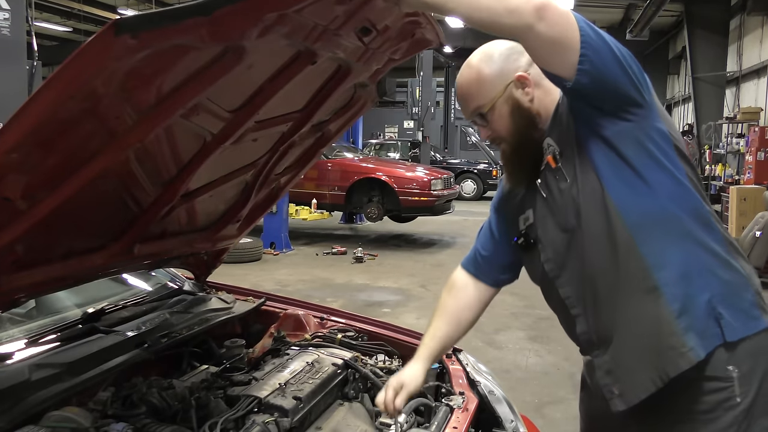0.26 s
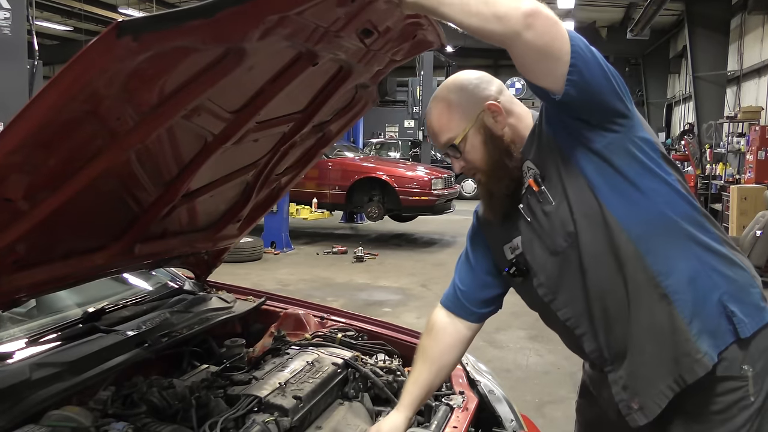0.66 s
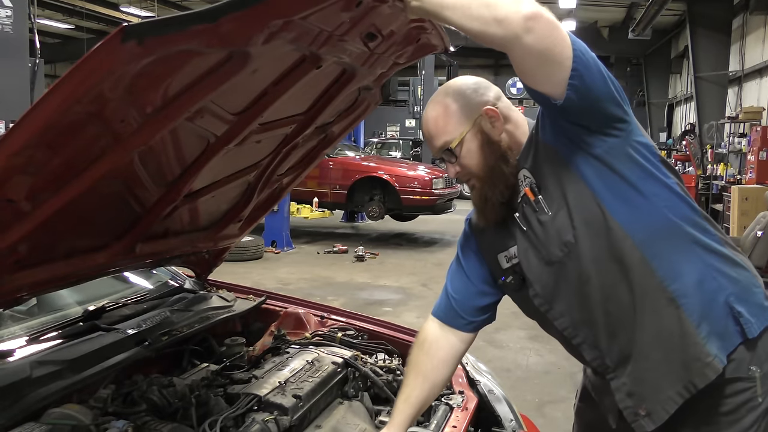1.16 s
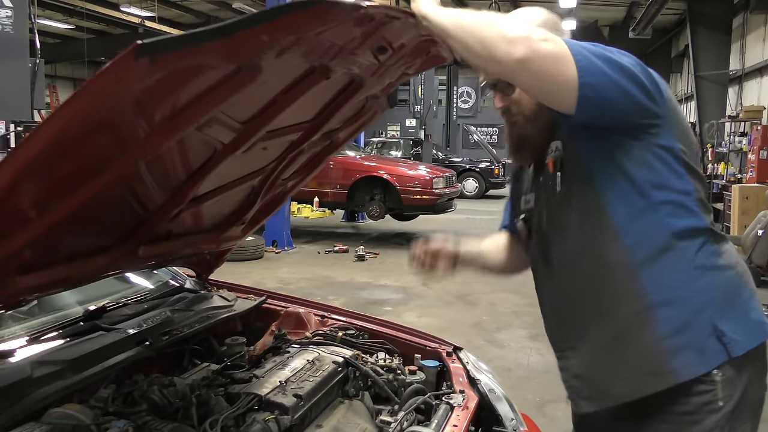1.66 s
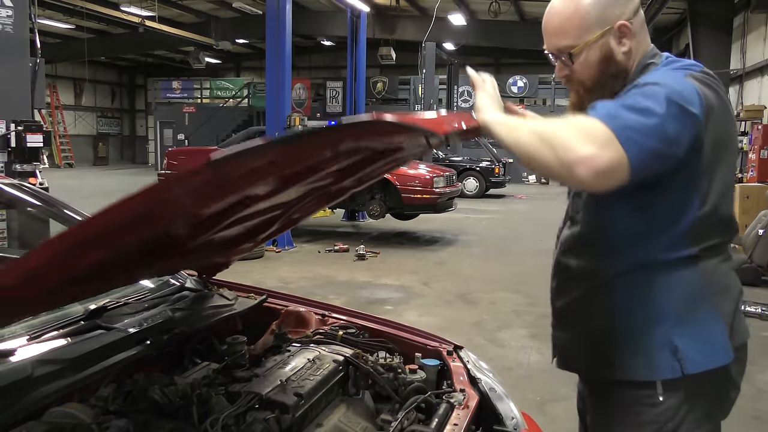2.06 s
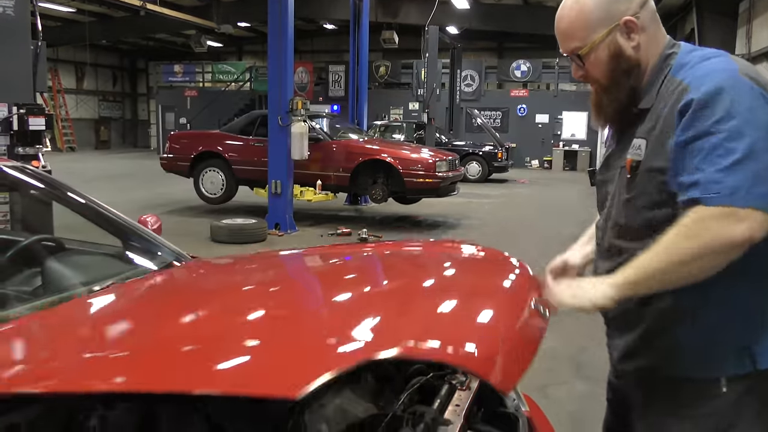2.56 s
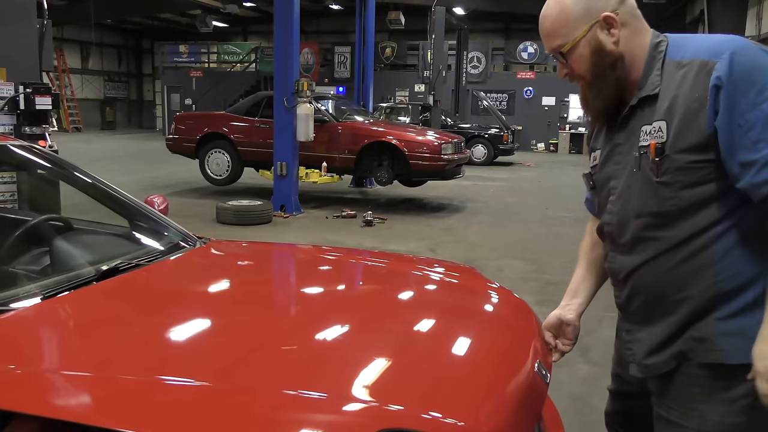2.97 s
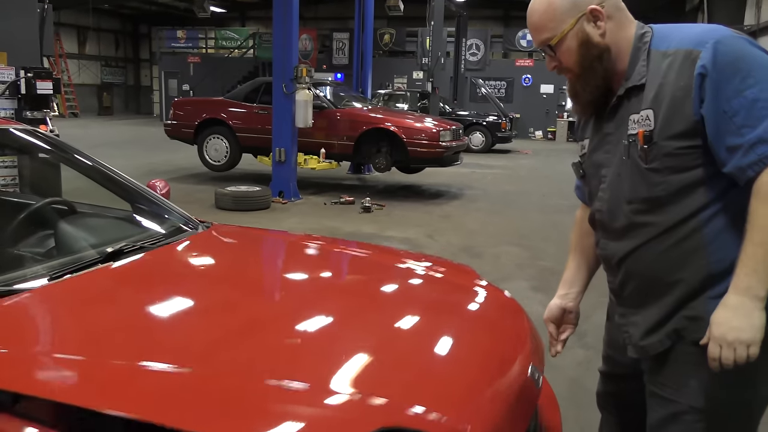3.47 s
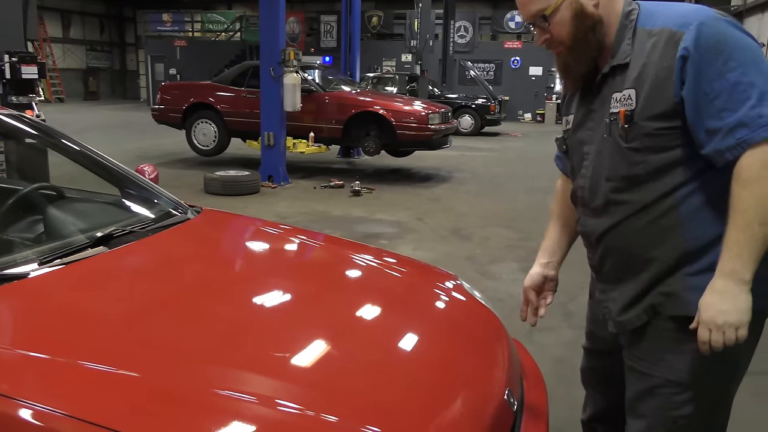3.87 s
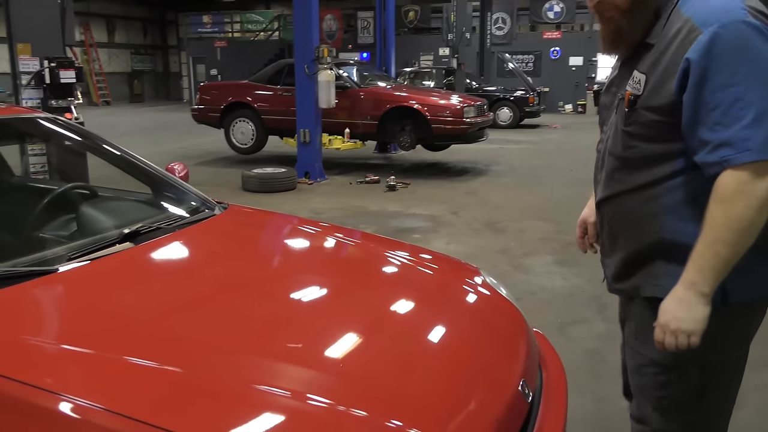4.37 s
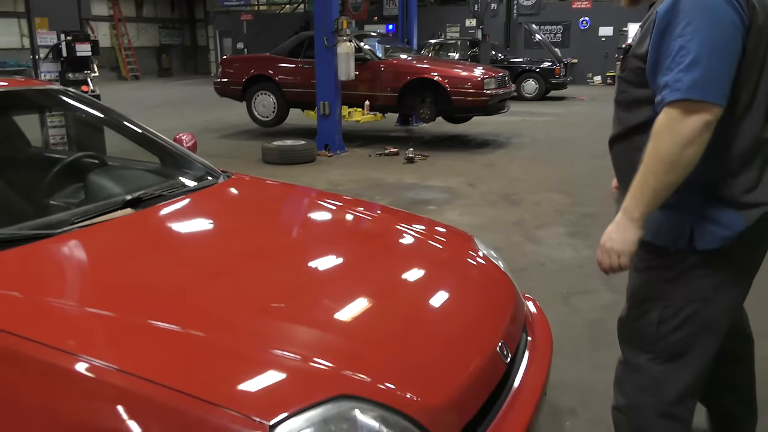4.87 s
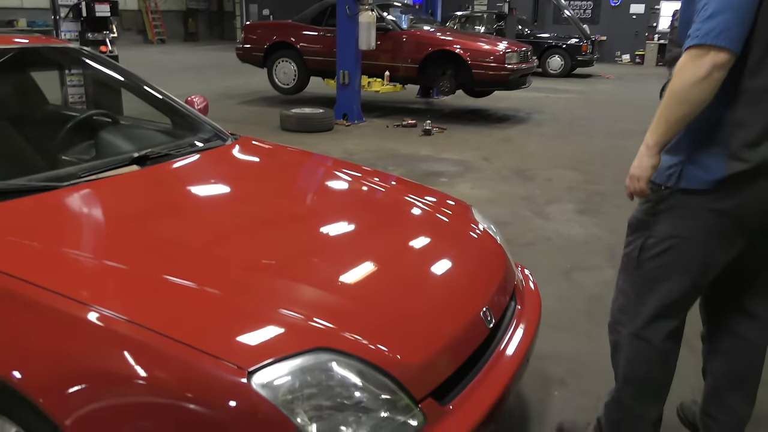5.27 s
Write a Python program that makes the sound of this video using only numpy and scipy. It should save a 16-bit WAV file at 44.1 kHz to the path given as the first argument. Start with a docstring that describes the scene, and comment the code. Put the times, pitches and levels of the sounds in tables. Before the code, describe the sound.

A low hum and steady hall noise fill a large workshop, with the action close to the microphone and clothes rustling faintly now and then. From about 0.3 seconds a steel prop rod scrapes and rattles lightly, then snaps into its clip at 1.2 seconds with a loud, ringing click. At 2 seconds the car hood gives a soft, hollow bonk under a hand, and its hinges creak and tick quietly from 2.4 to 2.8 seconds. The hood knocks sharply on its catch at 3.1 seconds. At 3.6 seconds it slams shut with a heavy metal boom, a latch clack and a brief shudder, echoing off the far walls. A very faint, thin, high squeal wanders from 4 to 5 seconds. Around 5 seconds boots thud softly on concrete with two tiny squeaks, and the hum carries on until the end at about 5.5 seconds.

```python
"""A workshop hall, close to a mechanic, over a low hum, hall noise and rustling clothes. A steel prop rod
scrapes, rattles and snaps into its clip (1.2 s). The hood bonks under a hand (2 s), creaks down on its
hinges, knocks on its catch (3.1 s) and slams shut (3.6 s), with the level pulled down around the slam.
The blows ring the metal and the far walls answer late. A thin squeal wanders through the tail, and
boots thud and squeak on the concrete (5 s)."""
import sys
import numpy as np
from scipy import signal
from scipy.fft import rfft, irfft
from scipy.io import wavfile
from scipy.ndimage import uniform_filter1d

SR = 44100
rng = np.random.default_rng(int(sys.argv[2]) if len(sys.argv) > 2 else 0)


def store_wav(level_fs):
    """Save 16-bit WAV to argv[1]."""
    pcm = np.round(np.clip(np.atleast_2d(level_fs), -1, 1) * 32767)
    wavfile.write(sys.argv[1], SR, pcm.T.astype(np.int16))


N = 243591

# hood on hinges, hands and rubber stops (time [s], level [dB], hardness [dB], chatter [ms])
HOOD_HITS = [(2.0055, -26, -4, 4.7), (2.027, -25, -12, 9.4), (2.045, -31, -8, 15), (2.07, -31, -8, 15),
             (2.4, -43, 1, 3.5), (2.541, -34, 4, 5.5), (2.622, -33, 1, 5.6), (2.751, -31, -5, 1.7),
             (3.094, -7, 21, 16.4), (3.106, -16.5, 6.5, 10.8), (3.454, -44.5, -6, 13.6),
             (3.495, -43, -8, 19), (3.634, -3, -1, 9.4), (3.644, -1, -13, 4.3), (3.658, -4, -13, 23.4),
             (3.71, -13.5, -1, 85), (3.753, -10, -6, 11), (3.785, -15, -2.5, 81), (3.83, -18, -3, 11),
             (3.875, -19.5, -10, 17), (3.92, -26, -23, 30), (4.929, -35, -3, 7.3)]
# thump of the hood (frequency [Hz], level [dB])
HOOD_BODY = [(40, -32), (70, -4.5), (140, 3), (230, -4), (420, -1), (560, -5.5), (800, -8), (1150, -10.5),
             (2000, -27.5), (4000, -31), (15800, -61.5)]
# ring of the hood (frequency [Hz], level [dB], t60 [s])
HOOD_MODES = [(81.5, 0, 0.78), (135.3, 3, 0.74), (174.4, 0, 0.994), (283.35, 10.5, 0.464),
              (357, 10.5, 0.391), (424.4, 10, 0.26), (558, -3.5, 0.26), (764, -3, 0.38), (810, -27, 0.16),
              (994, -3.5, 0.55), (1165, -1, 0.14)]
# latch on its catch (time [s], level [dB], hardness [dB], chatter [ms])
LATCH_HITS = [(2.0023, -36, 33.5, 14), (2.6344, -40, -2.5, 4.8), (2.7801, -39.5, -11.5, 1.74),
              (3.0929, -30, 5, 2), (3.6107, -1, 1, 8.2), (3.6184, -8.5, -5, 7.3), (3.6274, -1, -9, 2.2),
              (3.6354, -7.5, -4.5, 12.4), (3.6464, -22, -6, 11), (3.7544, -28.5, 3, 2)]
# clack of the latch (frequency [Hz], level [dB])
LATCH_BODY = [(180, -4.5), (300, -0.5), (812, -20), (1090, -3), (1660, -13.5), (1990, -2), (2470, -14),
              (2720, -3.5), (4190, -13.5), (4790, -9), (15800, -27)]
# ring of the latch (frequency [Hz], level [dB], t60 [s])
LATCH_MODES = [(892, 2, 1.643), (2050, -6, 0.081), (3200, -7, 0.107), (4960, -19, 0.11)]
# prop rod on clip and frame (time [s], level [dB], hardness [dB], chatter [ms])
ROD_HITS = [(.662, -30, 0.5, 4.55), (.666, -23, 0.5, 1.3), (.676, -33.5, -1, 15), (.722, -35.5, 0.5, 4.7),
            (.731, -34.5, 2, 7.6), (.748, -31, -9.5, 5.55), (.77, -42.5, -5, 2.4), (.848, -43.5, -13.5, 11),
            (.875, -44.5, -16, 4.4), (1.159, -44, -0.5, 6.4), (1.2387, -9.5, -8.5, 0.56),
            (1.2398, 2, 7, 1.9), (1.2431, 0, 4.5, 2.8), (1.2535, -12.5, -6.5, 5.1), (1.539, -40.5, 1, 3.6),
            (1.719, -47, 4, 7.3), (1.812, -43, -2.5, 3.1)]
# snap of the rod (frequency [Hz], level [dB])
ROD_BODY = [(59, -46), (100, -13), (228, 2), (405, -8.5), (797, -3.5), (925, -9.5), (1120, -4.5),
            (2020, -10), (3440, -15.5), (10600, -21.5), (15800, -35)]
# ring of the rod (frequency [Hz], level [dB], t60 [s])
ROD_MODES = [(285.5, 7, 0.304), (544, 5, 0.265), (598, -4, 0.3), (795, 2.5, .15), (1050, -6, 0.27),
             (1207, 8, .14), (1815, 0, .1), (2090, -8.5, 0.22), (2683.2, -11.5, 0.2), (4054, -16.5, .1),
             (5110, -2, 0.054), (5890, -5.5, .08)]
# rod and hand sliding over the frame (time [s], hold [s], level [dB])
SCRAPES = [(.24, 0.0087, -55), (.335, 0.011, -46), (.67, 0.044, -55), (.745, 0.0048, -44),
           (.858, 0.02, -57)]
# hinges creaking as the hood swings down (time [s], hold [s], level [dB])
CREAKS = [(2.468, .015, -47), (2.565, 0.0057, -46.5), (2.643, 0.013, -47.5), (2.762, 0.011, -50.5)]
# hinge arm resonances (frequency [Hz], width [Hz], level [dB])
HINGE_RINGS = [(445, 42, 9.5), (540, 140, -1), (835.6, 58, 0.5), (1120, 280, -6)]
# boots on concrete (time [s], peak [dB])
STEPS = [(4.984, -34), (5.038, -30), (5.146, -29.5), (5.177, -32.5), (5.229, -42), (5.444, -42)]
# boot sole twisting (time [s], hold [s], level [dB])
SQUEAKS = [(4.965, .04, -64), (5.038, .012, -60)]
# path of the thin squeal (time [s], pitch [Hz], level [dB])
SQUEAL_PATH = [(3.98, 9000, -66), (4.02, 9200, -63), (4.07, 10300, -67), (4.12, 10100, -62),
               (4.17, 9900, -67), (4.22, 11300, -71), (4.3, 10300, -76), (4.38, 10900, -72),
               (4.44, 10100, -74), (4.48, 10150, -69), (4.56, 9900, -73), (4.575, 8900, -68),
               (4.64, 7700, -75), (4.8, 8600, -65), (4.84, 8600, -77), (4.9, 9000, -67),
               (4.912, 11200, -66), (4.98, 12500, -65), (5.07, 12800, -67), (5.1, 8900, -74)]
# clothes rubbing as arms and legs move (time [s], hold [s], level [dB], scuff offset [dB])
RUSTLES = [(0, 0.27, -73, 12), (1.016, .18, -76.5, 14), (1.73, .02, -67.5, -4), (1.865, .08, -61.5, -15.5),
           (2.13, .26, -58.5, -11), (2.53, 0.2927, -59.5, -1.5), (4.955, 0.078, -66, 3.5),
           (5.157, .01, -70, 6), (5.231, 0.017, -62, 8), (5.41, .12, -55.5, -10)]
# sheen of the cloth (frequency [Hz], width [Hz], level [dB])
CLOTH_BANDS = [(4440, 1750, 6), (6910, 960, 10), (8350, 600, 8.5), (11300, 3000, -29)]
# decay of the engine bay and floor echoes (frequency [Hz], t60 [s])
NEAR_T60 = [(100, 0.937), (300, 0.36), (1000, 0.48), (2300, 0.52), (3400, .45), (6000, 0.47),
            (12000, 0.091)]
# colour of those echoes (frequency [Hz], gain [dB])
NEAR_COLOUR = [(100, 3), (600, 0), (1200, -2), (2300, -2), (5000, -6), (12000, -6)]
# decay of the hall tail (frequency [Hz], t60 [s])
HALL_T60 = [(100, 2.38), (500, 0.887), (2300, 1.08), (5000, 1.3), (12000, 0.17)]
# colour of the hall tail (frequency [Hz], gain [dB])
HALL_COLOUR = [(60, 3), (250, 2.5), (900, -7), (2300, 2), (4000, 0.5), (8000, -6.5), (15000, -23)]
# sheet panels that the echoes shake (frequency [Hz], width [Hz], gain [dB])
PANEL_RINGS = [(2236, 43, 6.5), (1888, 140, -7), (3246, 82, -8)]
# hum (time [s], low pitch [Hz], low tone [dB], upper tone [dB], rumble [dB])
HUM_PATH = [(0, 67, -49.5, -50, -52.5), (.4, 67, -49, -42.5, -54.5), (.68, 67, -49.5, -56.5, -50),
            (1.75, 69, -51, -60, -54), (2.2, 75, -55.5, -55.5, -51.5), (3.4, 75, -57, -53, -51),
            (4.8, 76, -59, -63, -51.5), (5.15, 76, -56, -57.5, -46.5), (5.52, 76, -51.5, -66, -55.5)]
# colour of the hall noise (frequency [Hz], relative density [dB])
ROOM_TONE = [(15, -51), (25, -21), (70, 1), (141, -34), (174, -12.5), (361, -26), (392, -19.5), (425, -18),
             (527, -26), (604, -22.5), (1590, -32), (8490, -37), (15800, -46)]


def hood():
    """The wide steel sheet booms under soft, heavy blows."""
    return strike(HOOD_HITS, HOOD_BODY, HOOD_MODES, ring_db=-7.5, grain_db=1.5, corner_hz=224)


def latch():
    """The latch clacks on its catch: hard contacts with a faint ring."""
    return strike(LATCH_HITS, LATCH_BODY, LATCH_MODES, ring_db=-20, grain_db=3.5, corner_hz=3630)


def prop_rod():
    """The steel rod rings as it taps the frame and snaps into its clip."""
    return strike(ROD_HITS, ROD_BODY, ROD_MODES, ring_db=-3.5, grain_db=2, corner_hz=1520)


def strike(hits, body, modes, ring_db, grain_db, corner_hz):
    """Each blow is a dying chatter of uneven contacts; it sounds through the body and rings the modes."""
    out, t = np.zeros(N + SR), np.arange(SR) / SR
    ring = sum(undb(db) * np.sin(2 * np.pi * hz * t) * decay(t, t60) for hz, db, t60 in modes)
    metal = undb(ring_db) * ring / np.sqrt(np.sum(ring ** 2))
    crack = response(body)
    metal[:len(crack)] += crack
    for s, db, hardness_db, chatter_ms in hits:
        age = t[:int(.007 * chatter_ms * SR)]  # seven time constants
        push = rng.standard_normal(len(age)) * undb(grain_db * rng.exponential(size=len(age)))
        push *= np.exp(-age * 1000 / chatter_ms)
        soft = signal.lfilter(*signal.butter(1, corner_hz, fs=SR), push)
        push = soft + undb(hardness_db) * (push - soft)  # hardness is the bite above the corner
        blow = signal.fftconvolve(push, metal)[:SR]
        loudest = np.sqrt(uniform_filter1d(blow[:SR // 5] ** 2, SR // 500).max())
        out[int(s * SR):int(s * SR) + SR] += blow * undb(db) / loudest / 2
    return out[:N]


def hood_bonk(at_s=2.0055, db=-25, start_hz=410, end_hz=280, sag_s=.025):
    """The hood skin pops under the hand: a rough, hollow ring that sags in pitch as it slackens."""
    t = np.maximum(np.arange(N) / SR - at_s, 0)
    hz = end_hz + (start_hz - end_hz) * np.exp(-t / sag_s)
    ring = tone(hz * (1 + .12 * walk(300)))
    attack = 1 - np.exp(-t / .0017)
    return ring * undb(db + 1.5 * walk(120)) * decay(t, t60=.11) * attack


def rod_scrape():
    """Sliding contact sends dense, dull grains through the rod's body."""
    grains = rng.standard_normal(N) * undb(.78 * rng.exponential(size=N) + 2 * walk(90.3))
    steel = signal.fftconvolve(grains, response(ROD_BODY))[:N]
    dull = signal.lfilter(*signal.butter(2, 1500, fs=SR), steel)
    return swells(SCRAPES, rise_db_s=500, fall_db_s=355) * level(dull, 0)


def hinge_creak(slips_per_s=400):
    """Uneven stick-slip jerks ring the hinge arms."""
    slips = (rng.random(N) < slips_per_s / SR) * undb(3.2 * rng.standard_normal(N))
    arms = sum(undb(db) * band(band(slips, hz, width), hz, 3 * width) for hz, width, db in HINGE_RINGS)
    return swells(CREAKS, rise_db_s=223, fall_db_s=207) * level(arms, 0)


def footsteps(hz=104):
    """Boots thud on concrete: a low swing that dies within a few cycles."""
    out, t = np.zeros(N + SR), np.arange(SR // 2) / SR
    attack = 1 - np.exp(-t / .0027)
    thud = np.sin(2 * np.pi * hz * t) * decay(t, t60=.054) * attack
    for s, db in STEPS:
        out[int(s * SR):int(s * SR) + len(t)] += undb(db) * thud / thud.max()
    return out[:N]


def sole_squeaks(hz=4280, waver=.035):
    """A twisting boot sole gives two short, rough chirps."""
    return tone(hz * (1 + waver * walk(400))) * swells(SQUEAKS, rise_db_s=900, fall_db_s=900)


def squeal(waver=.017, rasp=.022, flicker_db=6):
    """A thin, high tone wanders and breaks up."""
    t = np.arange(N) / SR
    s, hz, db = np.transpose(SQUEAL_PATH)
    thin = tone(np.interp(t, s, hz) * (1 + waver * walk(60) + rasp * walk(600)))
    return thin * undb(np.interp(t, s, db, -120, -120) + flicker_db * (walk(80) - .5))


def clothes_rustle(slopes_db_s=(130, 190)):
    """Rubbing fibres shed fine grains in a few bright bands, with a duller scuff underneath."""
    sheen_gain = swells([row[:3] for row in RUSTLES], *slopes_db_s)
    scuff_gain = swells([(s, hold, db + offset) for s, hold, db, offset in RUSTLES], *slopes_db_s)
    grains = rng.standard_normal(N) * undb(2 * rng.exponential(size=N) + 1.1 * walk(44))
    sheen = sum(undb(db + 1.5 * walk(15)) * band(grains, hz, width) for hz, width, db in CLOTH_BANDS)
    scuff = undb(1.77 * walk(30)) * band(grains, 2300, 3500)
    return sheen_gain * level(sheen, 0) + scuff_gain * level(scuff, 0)


def far_walls(send, bands):
    """The hall answers late, and its tail shakes sheet panels."""
    tail = echoes(send, bands, HALL_T60, HALL_COLOUR, delay_s=.09, rise_s=.1)
    panels = sum(undb(db + 3 * walk(24.716)) * band(tail, hz, width) for hz, width, db in PANEL_RINGS)
    return tail + panels


def echoes(send, bands, t60, colour, delay_s, rise_s, block=16):
    """Diffuse reverb: the power in each band builds up, drains away and sounds as fresh noise."""
    out = 0
    send = np.pad(send, (int(delay_s * SR), block))[:(N // block + 1) * block]
    send = send + 1e-9 * rng.standard_normal(len(send))
    for hz, air in bands:
        power = np.mean(band(send, hz, hz / 3).reshape(-1, block) ** 2, axis=1)
        drain_s = on_log(t60, hz) / np.log(1e6)
        for seconds in (rise_s, drain_s):
            keep = np.exp(-block / (seconds * SR))
            power = signal.lfilter([1 - keep], [1, -keep], power)
        out = out + np.repeat(np.sqrt(power) * undb(on_log(colour, hz)), block)[:N] * air
    return out


def hum(upper_hz=115, waver_hz=3):
    """Two wavering low tones sit on a loose rumble."""
    s, *columns = np.transpose(HUM_PATH)
    low_hz, low_db, upper_db, rumble_db = (np.interp(np.arange(N) / SR, s, c) for c in columns)
    low, upper = (tone(hz + waver_hz * walk(10)) * undb(2 * walk(9.1)) for hz in (low_hz, upper_hz))
    rumble = band(band(rng.standard_normal(N), 112.5, 130), 112.5, 130)
    rumble = level(rumble, 0) * undb(rumble_db + 4.2 * walk(5.29))
    return undb(low_db) * low + undb(upper_db) * upper + rumble


def room_tone(bands):
    """A bed of hall noise: the bands swell together and flicker alone."""
    swell_db = .36 * walk(2.793)
    bed = sum(undb(on_log(ROOM_TONE, hz) + 10 * np.log10(hz) + swell_db + 2.4 * walk(31)) * air
              for hz, air in bands)
    return level(bed, -53.5)


def noise_bands():
    """Third-octave noise bands at rms 1, as (frequency [Hz], sound)."""
    centres = 30 * 2 ** np.arange(0, 9.4, 1 / 3)
    return [(hz, level(band(band(rng.standard_normal(N), hz, hz / 3), hz, hz / 3), 0)) for hz in centres]


def swells(rows, rise_db_s, fall_db_s):
    """Envelope that climbs to each event's level, holds and falls away."""
    t = np.arange(N) / SR
    return sum(undb(db - rise_db_s * np.maximum(s - t, 0) - fall_db_s * np.maximum(t - s - hold, 0))
               for s, hold, db in rows)


def decay(t, t60):
    """Fade that loses 60 dB in t60 seconds."""
    return np.exp(-np.log(1000) * t / t60)


def walk(rate):
    """Smooth random modulation: a new value every 1 / rate s, spread near 1."""
    hold = int(SR / rate)
    stairs = np.repeat(rng.standard_normal(N // hold + 1), hold)
    return 1.1 * uniform_filter1d(uniform_filter1d(stairs, hold), hold)[:N]


def tone(hz):
    """Sine at rms 1 that follows a pitch."""
    return np.sqrt(2) * np.sin(2 * np.pi * np.cumsum(hz) / SR)


def band(x, hz, width_hz):
    """Resonance with gain 1 at the centre."""
    return signal.lfilter(*signal.iirpeak(min(hz, .45 * SR), hz / width_hz, fs=SR), x)


def response(colour, size=4096):
    """Minimum-phase click of unit energy with the given colour."""
    cepstrum = irfft(np.log(undb(on_log(colour, np.fft.rfftfreq(size, 1 / SR)))))
    cepstrum[1:size // 2] *= 2
    cepstrum[size // 2 + 1:] = 0
    click = irfft(np.exp(rfft(cepstrum)))[:size // 2]
    return click / np.sqrt(np.sum(click ** 2))


def on_log(points, hz):
    """Read a curve on a log-frequency axis."""
    frequencies, values = np.transpose(points)
    return np.interp(np.log(np.maximum(hz, 1)), np.log(frequencies), values)


def level(x, db):
    """Scale to an rms level."""
    return x * undb(db) / np.sqrt(np.mean(x ** 2))


def undb(db):
    """Decibels to gain."""
    return np.exp(np.asarray(db) * np.log(10) / 20)


def scene():
    """Rod, hood and latch sound direct, off the car and floor, and off the far walls; the rest is dry."""
    rod, boom, clack = prop_rod(), hood(), latch()
    near_send = undb(-12) * rod + undb(-13) * boom + undb(-13.5) * clack
    far_send = undb(-29.5) * rod + undb(-44) * boom + undb(-14) * clack
    bands = noise_bands()
    near = echoes(near_send, bands, NEAR_T60, NEAR_COLOUR, delay_s=.0017, rise_s=.0013)
    # reversing or shifting the noise keeps the three washes unrelated
    hall = far_walls(far_send, [(hz, air[::-1]) for hz, air in bands])
    bed = room_tone([(hz, np.roll(air, N // 2)) for hz, air in bands])
    action = rod + boom + clack + rod_scrape() + hinge_creak() + hood_bonk() + footsteps()
    texture = hum() + clothes_rustle() + squeal() + sole_squeaks()
    return (action + near + hall + texture + bed)[None]


def record(dry, dip_s=(3.472, 4.168), dip_db=-8.5, top_hz=15960):
    """The microphone sheds deep bass, the level ducks around the slam, peaks clip and the top is cut."""
    t = np.arange(N) / SR
    dip = uniform_filter1d(1. * ((t > dip_s[0]) & (t < dip_s[1])), SR // 500)
    mic = signal.lfilter(*signal.butter(2, 36, "high", fs=SR), dry)
    clipped = np.clip(mic * undb(dip_db * dip), -1, 1)
    return signal.sosfilt(signal.ellip(10, .2, 60, top_hz, fs=SR, output="sos"), clipped)


dry = scene()
out = record(dry)
store_wav(out)
```